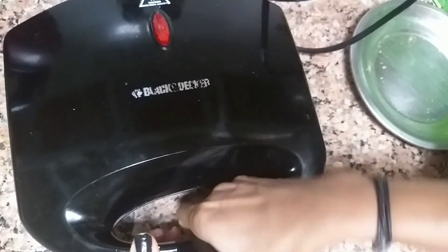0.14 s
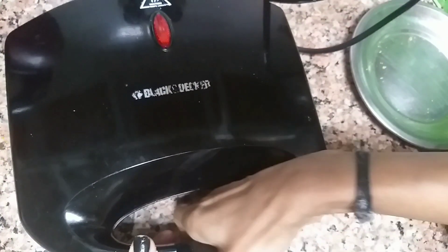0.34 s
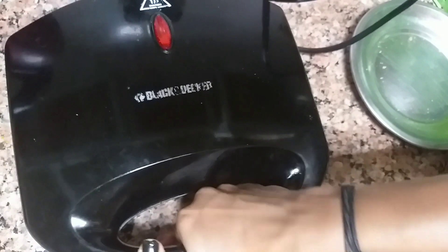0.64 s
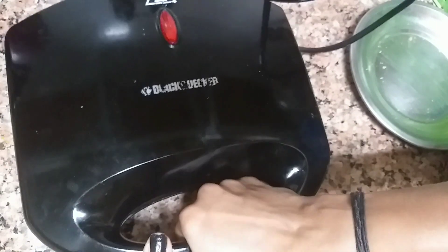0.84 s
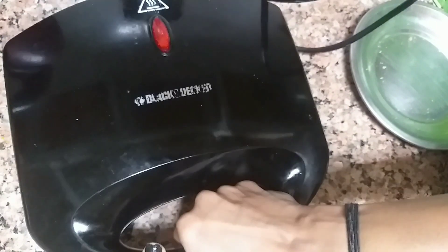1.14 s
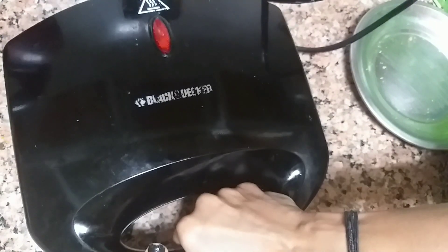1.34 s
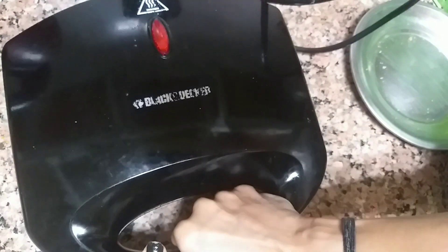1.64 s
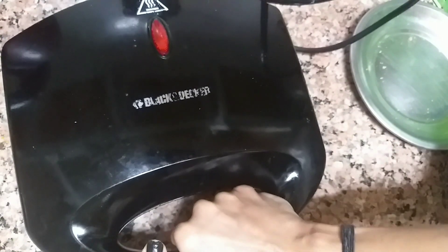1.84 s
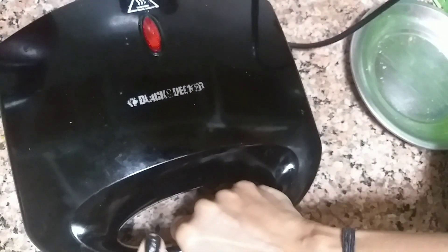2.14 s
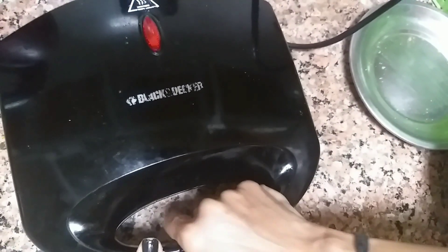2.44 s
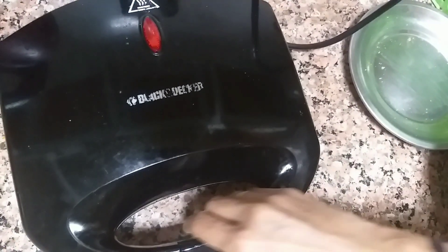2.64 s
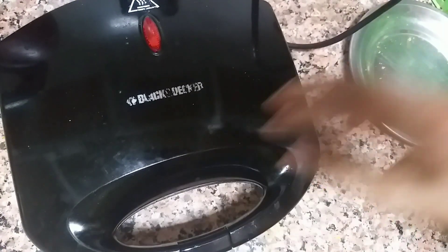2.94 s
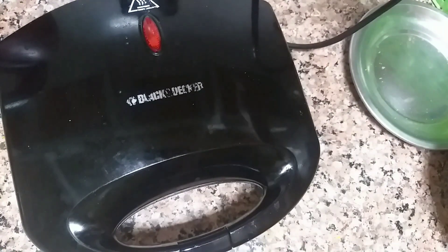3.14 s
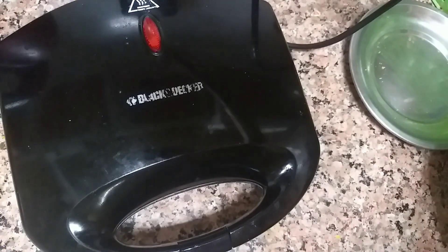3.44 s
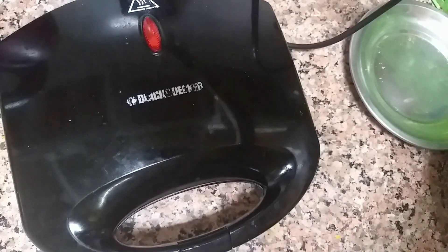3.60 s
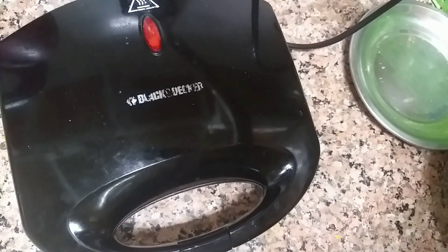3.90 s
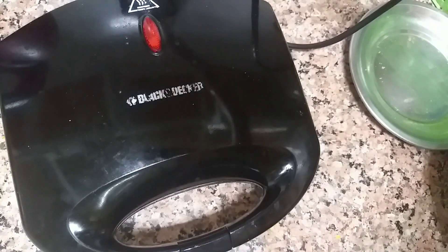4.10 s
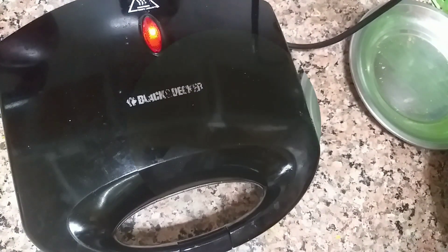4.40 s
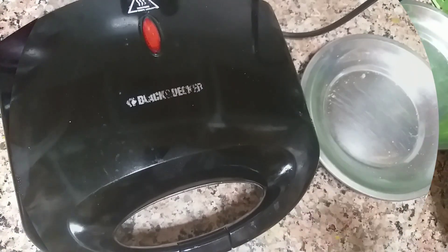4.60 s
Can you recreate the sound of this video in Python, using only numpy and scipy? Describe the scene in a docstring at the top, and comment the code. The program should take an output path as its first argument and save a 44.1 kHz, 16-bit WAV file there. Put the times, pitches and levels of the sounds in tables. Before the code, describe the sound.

A close, nearly mono perspective in a small, hard-surfaced kitchen, with a very faint refrigerator hum, low rumble and thin whine throughout. From 0 to 0.9 s a hand slides softly on plastic, with barely audible ticks and a tiny high squeak near 0.5 s. At about 0.98 s the latch gives a sharp, bright double click, followed by soft dull knocks at 1.05 and 1.2 s. Brief low plastic groans build from 1.6 to 1.8 s, breaking into a hollow knock, a rapid little clatter and a scrape until about 2 s. Rounder knocks come at 2.3 s and a clackier one at 2.45 s, then faint touches until 2.8 s. Near silence follows. Tiny ticks at 4.16-4.2 s precede a very loud, hard metallic snap at 4.23 s, ringing briefly with a faint shimmer. From 4.63 s a steady hiss with fine spatter swells quickly and holds to the end.

```python
"""Sandwich maker on a stone counter

A hand presses down the lid of a plastic sandwich maker and works its latch: struck modes and noise
bursts click, clatter and knock, while shaped noise and a wavering tone give rubs, a squeak and groans.
Later the thermostat snaps over in a hard, ringing crack and a hiss of noise with spatter swells up.
A refrigerator hums behind it all in steady tones and noise, and the small hard room answers every click."""
import sys
import numpy as np
from scipy import signal
from scipy.fft import rfft, irfft, next_fast_len
from scipy.io import wavfile
from scipy.ndimage import uniform_filter1d, map_coordinates

SR = 44100
rng = np.random.default_rng(int(sys.argv[2]) if len(sys.argv) > 2 else 0)


def waveform_to_disk(signal):
    """Save audio, clipped to [-1, 1], as 16-bit WAV at the path in sys.argv[1]."""
    frames = np.transpose(np.atleast_2d(signal))
    scaled = np.clip(frames, -1, 1) * 32767
    samples = np.round(scaled).astype(np.int16)
    wavfile.write(sys.argv[1], SR, samples)


N = 209769
T = np.arange(int(0.7 * SR)) / SR  # the time axis of one blow, in seconds

# Contacts of lid and latch. Each row: start in seconds, body knock in dB, shell clack in dB, edge tick in dB,
# clack brightness in dB per octave, tick brightness in dB per octave.
LATCH_CONTACTS = [(0.038, -67, -60, -70, -5, -6), (0.525, -64, -62, -52.5, -8, 2.5),
                  (0.857, -90, -63.5, -75, 9, 0), (0.9739, -50.5, -40.5, -49, 9, 4),
                  (0.977, -50.5, -32.5, -30, 8.5, -0.5), (0.982, -47.5, -35, -36, 6, 1.5),
                  (1.051, -48.5, -48.5, -49, 1, 1), (1.204, -66, -61, -57.5, 0, -7),
                  (1.217, -49, -55.5, -58.5, -2, -5), (1.381, -74, -64, -60.5, -1, 2.5),
                  (1.491, -65, -68, -67, 1, -2), (1.799, -53, -52, -60, -2, -5),
                  (1.8181, -41.5, -42, -45, -3, 0), (1.913, -51, -46.5, -48, -3, 0.5),
                  (2.279, -45.5, -53, -78, -2, -4), (2.3233, -37.5, -43.5, -62, -4, -3),
                  (2.4525, -43.5, -39.5, -49, -4, 6.5), (2.656, -65, -74, -67.5, -1, 8),
                  (2.769, -80, -80, -69.5, 10, 3)]
# The loose latch chatters as it slips. Each row: start in seconds, end in seconds, mean gap between
# rebounds in seconds, then the first rebound's body knock, shell clack and edge tick in dB.
LATCH_RATTLES = [(1.841, 1.89, 0.0195, -56.5, -50, -49), (1.925, 1.967, 0.0115, -50, -44.5, -54.5)]
# The base rocks on its feet. Each row: start in seconds, level in dB.
BASE_THUDS = [(1.052, -49), (1.217, -55.5)]
# The housing with its hollow. Each row: frequency in Hz, relative level in dB, t60 in seconds.
BODY_MODES = [(162, -15, 0.13), (378, -15, 0.027), (448, -3.5, 0.061), (491.3, 2.5, 0.078),
              (565.6, -6, 0.13), (690, -8, 0.071)]
# The plastic shell before any brightening. Each row: frequency in Hz, relative level in dB, t60 in seconds.
SHELL_MODES = [(760, -2, 0.049), (1017, 1.5, 0.029), (1184, -0.5, 0.028), (1612, 2, 0.033),
               (1927, -3, 0.054), (2175, -4, 0.027), (3010, -12, 0.026), (3200, -10, 0.016)]
# The whole appliance bouncing on rubber feet, its base ringing along. Each row: frequency in Hz,
# relative level in dB, t60 in seconds.
FEET_MODES = [(70.6, 2, 0.31), (109, -4, .25), (156, 3, 0.14), (565, 1, 0.3)]
# Noise colours of clack and tick before any brightening. Each row: frequency in Hz, density in dB per Hz.
CLACK_COLOUR = [(300, -30), (620, -13), (820, 0.5), (1100, 4.5), (1600, -3), (2400, -1.5), (3500, -15.5),
                (5500, -40.5)]
TICK_COLOUR = [(1500, -24.5), (3000, -0.5), (4800, -0.5), (6200, -4.5), (8600, -2.5), (10200, -20),
               (13000, -18), (16000, -32)]
# The hand slides on the handle, and at 1.9 s the latch on its catch, in short strokes. Each row:
# start in seconds, length in seconds, level in dB ahead of the rub's trim.
SLIDE_STROKES = [(0.0, 0.13, -63), (0.262, 0.032, -61.5), (0.378, 0.04, -67), (0.47, 0.07, -62.5),
                 (0.67, 0.036, -70.5), (0.83, 0.06, -73), (1.9, 0.049, -50.5)]
# Noise colour of the sliding. Each row: frequency in Hz, density in dB per Hz.
SKIN_COLOUR = [(400, -22), (1000, 6), (1700, -0.5), (2600, -17.5), (8500, -15), (11000, -31.5)]
# The plastic groans at each push, hardest just before the latch gives. Each row: start in seconds,
# length in seconds, level in dB.
PLASTIC_GROANS = [(1.6, 0.055, -58.5), (1.704, 0.04, -60.5), (1.765, 0.031, -50.5), (1.791, 0.012, -39)]
# A thin, high scrape just before the light contact at 0.525 s. Each row: start in seconds,
# length in seconds, level in dB.
PLASTIC_SQUEAKS = [(0.488, 0.032, -68.5)]
# The thermostat spring creeps, then snaps over. Each row: start in seconds, level in dB.
THERMOSTAT_SNAPS = [(4.163, -46.5), (4.188, -51), (4.207, -63), (4.2307, -12.5)]
# The steel spring and its bracket. Each row: frequency in Hz, relative level in dB, t60 in seconds.
SPRING_MODES = [(1590, -20.5, 0.061), (2214, -10, 0.057), (2600, -11.5, 0.054), (3315, -6, 0.025),
                (4410, -2, 0.024), (4490, -10.5, 0.12), (5280, -5, 0.077), (5900, -5.5, 0.033),
                (6586, 0.5, 0.036), (7210, 2, 0.044), (7370, -2, 0.025), (7660, -13.5, 0.087),
                (8040, -2.5, .06), (8620, -13, 0.065), (8220, -11, 0.15), (12670, -16, 0.083)]
# Noise colours of the snap and of the hot plates' high modes. Each row: frequency in Hz, density in dB per Hz.
CRACK_COLOUR = [(200, -57), (600, -40), (1200, -21), (1600, -20), (2200, -11), (3800, -9), (4500, 1),
                (5200, -3), (6200, -5), (8200, -1.5), (9200, -6.5), (10300, -19), (12700, -10.5),
                (16000, -22)]
SHIMMER_COLOUR = [(2000, -44), (4500, -11), (5800, -4), (7200, 5), (8600, 3), (10000, -14.5), (12700, -12),
                  (15000, -34)]
# Noise colours of the sizzle and of the room's rumble. Each row: frequency in Hz, density in dB per Hz.
SIZZLE_COLOUR = [(180, -55.5), (300, -19), (469, -9), (592, -16), (735, -8.5), (1550, -9.5), (2230, -8.5),
                 (2590, -14), (3380, -2), (6240, -6), (7740, 1), (10600, -13.5), (15800, -11)]
AIR_COLOUR = [(12, -58), (20, -21), (48, -15.5), (85, 4.5), (172, -9.5), (292, -17), (397, -11.5),
              (554, -10), (674, -7.5), (733, -15), (969, -21), (2570, -27), (2960, -20), (3500, -27),
              (15800, -37)]
# The refrigerator's tones. Each row: frequency in Hz, central level in dB rms.
HUM_TONES = [(86.1, -84.5), (398.4, -85.5), (436.0, -87), (635.2, -75.5), (683.7, -72), (1222, -91),
             (1459, -90), (2880, -85), (3058, -90), (3262, -88.5), (5006, -98.5), (6481, -99)]
# The refrigerator's hissing bands. Each row: centre in Hz, width in Hz, relative level in dB.
WHINE_BANDS = [(3140, 190, -1), (5040, 110, -2.5), (6510, 220, -8)]
# How long the kitchen rings. Each row: frequency in Hz, t60 in seconds.
KITCHEN_DECAY = [(150, 0.14), (500, 0.49), (1500, 0.43), (4000, 0.42), (8000, 0.39), (14000, 0.33)]
# Slight stereo width. Each row: frequency in Hz, side level against mid in dB.
STEREO_WIDTH = [(60, -36), (500, -43.5), (850, -34), (1250, -28), (1800, -8), (2800, -21), (5000, -48),
                (8000, -22.5), (10000, -4), (13000, -45)]

# change from one rebound to the next: clack and tick weaken, the knock grows slightly
KNOCK_LOSS_DB, CLACK_LOSS_DB, TICK_LOSS_DB = -0.3, 2.5, 4.5
RATTLE_CLACK_SLOPE, RATTLE_TICK_SLOPE = -1.2, -0.88  # brightness of a rebound, dB per octave
RATTLE_JITTER_S = 0.0012  # rebounds come early or late by up to this
KNOCK_ROOM_DB, CLACK_ROOM_DB = -4.5, -3.5  # the kitchen's answer
STROKE_ATTACK_S, STROKE_RELEASE_S = 0.011, 0.044
GROAN_ATTACK_S, GROAN_RELEASE_S = 0.0095, 0.0067
GROAN_HZ = 460
SQUEAK_HZ, SQUEAK_WIDTH_HZ = 8640, 700
SIZZLE_START_S, SIZZLE_RISE_S, SIZZLE_DB = 4.628, 0.11, -42
DROPS_PER_S = 250
SIDE_TURN_RAD = 1.22
TOP_HZ = 15850


def amp(db):
    """Decibels to gain."""
    return 10 ** (np.asarray(db) / 20)


def unit(x):
    """x at rms 1."""
    return x / np.sqrt(np.mean(x ** 2) + 1e-20)


def blow(x):
    """x with the energy of 10 ms at rms 1."""
    return x * np.sqrt(SR / 100) / np.linalg.norm(x)


def along(points, hz):
    """(Hz, value) points read on a log axis."""
    f, v = np.transpose(points)
    return np.interp(np.log(hz + 1), np.log(f + 1), v)


def tilted(rows, slope):
    """(Hz, dB, ..) rows tilted around 1 kHz by slope dB per octave."""
    return [(hz, db + slope * np.log2(hz / 1000), *rest) for hz, db, *rest in rows]


def wobble(rate):
    """A smooth random curve, rate knots a second."""
    knots = rng.standard_normal(int(N * rate / SR) + 4)
    return map_coordinates(knots, [np.arange(N) * rate / SR])


def swells(rows, attack, release):
    """A gain per sample from (s, length s, dB) rows: each rises, holds and dies away."""
    t = np.arange(N) / SR
    gain = np.zeros(N)
    for s, length, db in rows:
        rise = np.clip((t - s) / attack, 0, 1)
        gain += amp(db) * rise * np.exp(-np.maximum(t - s - length, 0) / release)
    return gain


def filtered(x, response):
    """x times a response of frequency."""
    n = x.shape[-1]
    m = next_fast_len(n + 8192)
    return irfft(rfft(x, m) * response(np.fft.rfftfreq(m, 1 / SR)), m)[..., :n]


def noise(colour):
    """Steady noise of rms 1."""
    return unit(filtered(rng.standard_normal(N), lambda hz: amp(along(colour, hz))))


def burst(colour, envelope, size=1024):
    """A short noise burst through a causal, minimum-phase colour."""
    cepstrum = irfft(np.log(amp(along(colour, np.fft.rfftfreq(size, 1 / SR)))))
    # folding the cepstrum forward keeps the filter from sounding ahead of the blow
    cepstrum[1:size // 2] *= 2
    cepstrum[size // 2 + 1:] = 0
    response = irfft(np.exp(rfft(cepstrum)))
    grains = envelope * rng.standard_normal(len(T))
    return blow(signal.fftconvolve(grains, response)[:len(T)])


def fade(t60):
    """Exponential decay by 60 dB in t60 seconds."""
    return np.exp(-np.log(1000) * T / t60)


def ring(modes, scatter_db, attack, phase_spread=1):
    """Damped modes with scattered strengths; modes that start in step give a sharp first swing."""
    total = np.zeros(len(T))
    for hz, db, t60 in modes:
        strength = amp(db + scatter_db * rng.standard_normal())
        phase = 2 * np.pi * (hz * T + phase_spread * rng.random())
        total += strength * fade(t60) * np.sin(phase)
    return blow(total * (1 - np.exp(-T / attack)))


def add(track, s, x):
    """Mix x into the track at s seconds."""
    part = track[round(s * SR):][:len(x)]
    part += x[:len(part)]


def lid():
    """Single contacts, runs of fading rebounds, and the base rocking on its feet."""
    out = np.zeros(N)
    for s, *touch in LATCH_CONTACTS:
        add(out, s, contact(*touch))
    for start, end, gap, knock_db, clack_db, tick_db in LATCH_RATTLES:
        for k, s in enumerate(np.arange(start, end, gap)):
            rebound = contact(knock_db - k * KNOCK_LOSS_DB, clack_db - k * CLACK_LOSS_DB,
                              tick_db - k * TICK_LOSS_DB, RATTLE_CLACK_SLOPE, RATTLE_TICK_SLOPE)
            add(out, s + RATTLE_JITTER_S * rng.uniform(-1, 1), rebound)
    for s, db in BASE_THUDS:
        add(out, s, amp(db) * ring(FEET_MODES, scatter_db=0.0, attack=0.0046))
    return out


def contact(knock_db, clack_db, tick_db, clack_slope, tick_slope):
    """One contact knocks the housing, clacks the shell and ticks at the hard latch edge."""
    knock = amp(knock_db) * ring(BODY_MODES, scatter_db=2, attack=0.0011, phase_spread=0.17)
    # a harder contact favours the shell's higher modes
    shell = ring(tilted(SHELL_MODES, clack_slope), scatter_db=2, attack=0.00045)
    clatter = burst(tilted(CLACK_COLOUR, clack_slope), fade(0.035))
    clack = amp(clack_db) * blow(shell + amp(-1) * clatter)
    tick = amp(tick_db) * burst(tilted(TICK_COLOUR, tick_slope), fade(0.053))
    knock_heard = in_room(knock, KNOCK_ROOM_DB, blur_hz=60)
    return knock_heard + in_room(clack + tick, CLACK_ROOM_DB, blur_hz=282)


def slides_and_groans():
    """Sliding surfaces stick and slip; under load the plastic groans near its main resonance."""
    friction = unit(noise(SKIN_COLOUR) * amp(2.0 * wobble(110.7)))
    rub = amp(-2.0) * swells(SLIDE_STROKES, STROKE_ATTACK_S, STROKE_RELEASE_S) * friction
    # the groan's phase wanders, so its pitch wavers
    tone = np.sin(2 * np.pi * GROAN_HZ * np.arange(N) / SR + 0.92 * wobble(70))
    grit = noise([(250, -30), (380, -5.5), (470, -1.0), (560, -1), (750, -18.5), (1500, -43.5)])
    groan = unit(tone + amp(-3.5) * grit)
    return rub + swells(PLASTIC_GROANS, GROAN_ATTACK_S, GROAN_RELEASE_S) * groan


def squeak():
    """Smooth plastic rubbing lightly sings in one narrow band."""
    resonance = lambda hz: 1 / (1 + (2 * (hz - SQUEAK_HZ) / SQUEAK_WIDTH_HZ) ** 2)
    band = unit(filtered(rng.standard_normal(N), resonance))
    return swells(PLASTIC_SQUEAKS, STROKE_ATTACK_S, STROKE_RELEASE_S) * band


def thermostat():
    """The spring flips with a sharp burst of noise that dies quickly, and rings."""
    out = np.zeros(N)
    for s, db in THERMOSTAT_SNAPS:
        onset = np.exp(-np.maximum(T - 0.0052, 0) / 0.0007)  # a weaker part over the first 5 ms
        envelope = np.minimum(1, T / 0.00029) * (onset + amp(12.0) * fade(0.061))
        spring = ring(SPRING_MODES, scatter_db=1, attack=0.0004)
        # the small spring radiates little bass, but it jolts the plastic shell
        spring = filtered(spring, lambda hz: amp(along([(400, -21), (1200, 0)], hz)))
        jolt = ring(SHELL_MODES, scatter_db=2, attack=0.001)
        snap = blow(burst(CRACK_COLOUR, envelope) + amp(-2) * spring + amp(-28) * jolt)
        # the many close modes of the metal plates shimmer on faintly, as noise
        shimmer = amp(-31.5) * burst(SHIMMER_COLOUR, fade(3.6))
        add(out, s, amp(db) * (in_room(snap, room_db=-5.5, blur_hz=600) + shimmer))
    return out


def sizzle():
    """A fine hiss with sparse, sharper spatter in it grows steadily to its full level."""
    drops = (rng.random(N) < DROPS_PER_S / SR) * amp(3 * rng.standard_normal(N))
    drop_envelope = signal.fftconvolve(drops, fade(0.01))[:N]
    spatter = unit(drop_envelope * noise(SIZZLE_COLOUR))
    growth = np.clip((np.arange(N) / SR - SIZZLE_START_S) / SIZZLE_RISE_S, 0, 1)
    return amp(SIZZLE_DB) * growth * unit(noise(SIZZLE_COLOUR) + amp(-4) * spatter)


def refrigerator():
    """Room rumble, slightly unsteady compressor tones, a low drone and narrow hissing bands."""
    t = np.arange(N) / SR
    hum = np.zeros(N)
    for hz, db in HUM_TONES:
        level = amp(db + 0.71 * wobble(3.72)) * np.sqrt(2)
        hum += level * np.sin(2 * np.pi * hz * t + 0.52 * wobble(3.4))
    bands = lambda f: sum(amp(db) / (1 + (2 * (f - hz) / width) ** 2) for hz, width, db in WHINE_BANDS)
    whine = amp(-80.5) * unit(filtered(rng.standard_normal(N), bands))
    drone = amp(-75) * noise([(140, -32.5), (169, -12.5), (195, -35), (400, -79)])
    rumble = amp(-65.5) * noise(AIR_COLOUR)
    return hum + whine + drone + rumble


def in_room(x, room_db, blur_hz, build=0.0027):
    """A blow plus a fresh kitchen echo: noise that builds up quickly and decays at a rate set by pitch."""
    hz, t, z = signal.stft(rng.standard_normal(len(T)), SR, nperseg=256)
    decay = np.exp(-np.log(1000) * t / along(KITCHEN_DECAY, hz)[:, None])
    tail = signal.istft(z * decay, SR, nperseg=256)[1][:len(T)]
    tail = tail * (1 - np.exp(-T / build))
    # the walls collect sound from all sides of the object, which blurs the fine ripples of its spectrum
    grid = np.fft.rfftfreq(len(T), 1 / SR)
    power = uniform_filter1d(np.abs(rfft(x)) ** 2, max(1, int(blur_hz / grid[1])))
    radiated = np.sqrt(np.abs(power))
    echo = filtered(tail / np.linalg.norm(tail), lambda f: np.interp(f, grid, radiated))
    return x + amp(room_db) * echo


def scene():
    """All sources, nearly mono, with a slight frequency-dependent width."""
    mid = lid() + slides_and_groans() + squeak() + thermostat() + sizzle() + refrigerator()
    side = filtered(mid, lambda hz: amp(along(STEREO_WIDTH, hz)) * np.exp(1j * SIDE_TURN_RAD))
    return np.array([mid + side, mid - side])


def record(dry):
    """The recorder rounds off the highest peaks and keeps nothing above its band limit."""
    ceiling = 1.0
    rounded = dry / (1 + (dry / ceiling) ** 4) ** (1 / 4)
    return filtered(rounded, lambda hz: hz < TOP_HZ)


dry = scene()
out = record(dry)
waveform_to_disk(out)
```